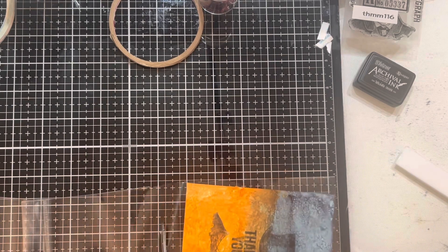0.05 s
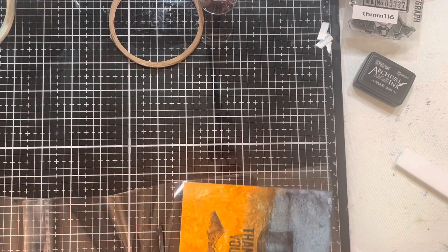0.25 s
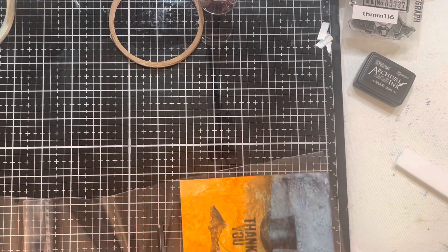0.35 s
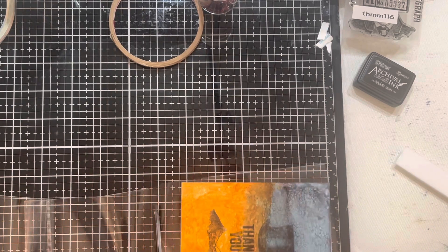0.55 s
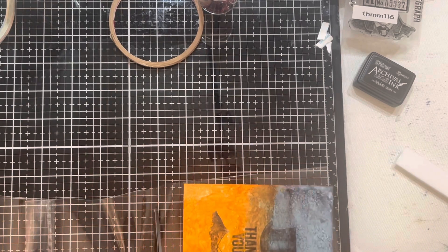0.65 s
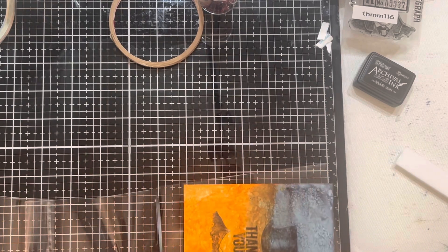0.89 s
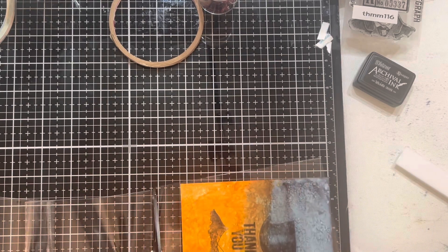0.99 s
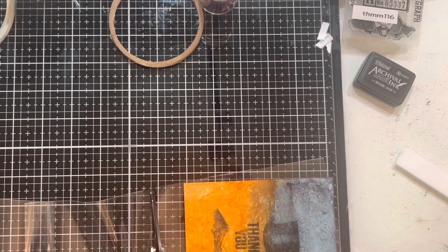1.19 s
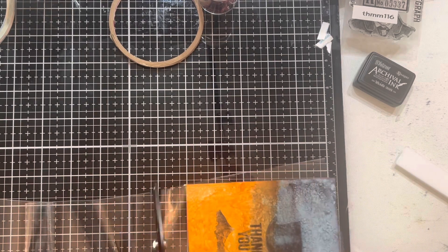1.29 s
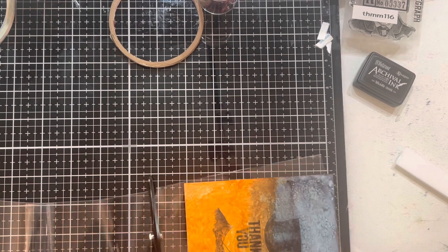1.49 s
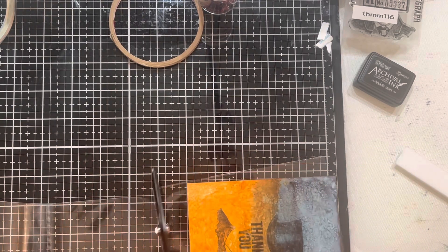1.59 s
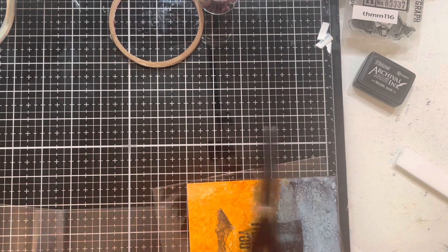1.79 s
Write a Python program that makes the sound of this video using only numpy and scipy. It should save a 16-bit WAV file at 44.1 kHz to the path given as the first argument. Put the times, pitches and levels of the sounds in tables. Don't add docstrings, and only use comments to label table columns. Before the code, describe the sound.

Scissors snip four times through thin crinkly plastic film, close up on a craft table

```python
import sys
import numpy as np
from scipy import signal
from scipy.fft import rfft, irfft
from scipy.io import wavfile
from scipy.ndimage import uniform_filter1d

SR = 44100
rng = np.random.default_rng(int(sys.argv[2]) if len(sys.argv) > 2 else 0)


def transcribe(u):
    v = np.clip(np.atleast_2d(u).T, -1, 1)
    q = np.round(v * 32767).astype(np.int16)
    wavfile.write(sys.argv[1], SR, q)


def linear_from_db(decibels):
    return 10 ** (np.asarray(decibels, float) / 20)


N = 81585


def noise():
    return rng.standard_normal(N)


def unit(x):
    return x / np.sqrt(np.mean(x ** 2) + 1e-18)


def colour(x, points):
    hz, db = np.array(points).T
    gain_db = np.interp(np.log(np.arange(1025) * SR / 2048 + 1), np.log(hz), db)
    cepstrum = irfft(gain_db * np.log(10) / 20)
    cepstrum[1:1024] *= 2
    taps = irfft(np.exp(rfft(cepstrum[:1024], 2048)))[:1024]
    return signal.fftconvolve(x, taps / np.linalg.norm(taps))[:N]


def band(x, hz, width_hz):
    return signal.lfilter(*signal.iirpeak(hz, hz / width_hz, SR), x)


def ticks(times_s, db):
    out = np.zeros(N)
    index = np.minimum((np.asarray(times_s) * SR).astype(int), N - 1)
    np.add.at(out, index, linear_from_db(np.asarray(db)))
    return out


def fade(x, peak_s):
    t = np.arange(int(12 * peak_s * SR)) / SR / peak_s
    return signal.fftconvolve(x, np.e * t * np.exp(-t))[:N]


def tilt(x, db):
    high = signal.butter(2, 5000, "high", fs=SR, output="sos")
    return x + (linear_from_db(db) - 1) * signal.sosfiltfilt(high, x)


# t/s, level/dB, slip rate/Hz, treble tilt/dB (bite moving along the blades)
STROKE_1 = [(.19, -38, 274, 2.5), (0.201, -29.5, 330, 1), (0.21, -21, 400, 4.5), (0.226, -29, 416, 3.5),
            (0.235, -22.5, 450, -1), (0.263, -24.5, 430, -3.5), (0.278, -33, 300, 4.5)]
STROKE_2 = [(.611, -32, 305.7, 0), (.621, -18.5, 328, 1), (.625, -20.5, 401.3, 0.5), (0.639, -25, 410.7, 4),
            (.66, -26, 433.2, 2), (0.674, -23.5, 394.5, 1.5), (0.687, -26, 254, 2)]
STROKE_3 = [(1.066, -59, 396.3, 1), (1.072, -27, 404.2, 1), (1.074, -21.5, 398.3, 1.5),
            (1.094, -23, 380.3, 3), (1.103, -27, 320.5, 5), (1.133, -23, 316, 3.5), (1.149, -29, 200, -2)]
STROKE_4 = [(1.482, -43, 450, 5), (1.489, -31.5, 451.8, 1.5), (1.498, -18.5, 788.7, 2.5),
            (1.51, -27, 800, 1.5), (1.519, -26.5, 780, 4), (1.53, -31, 441, 1.5), (1.542, -56, 400, -9),
            (1.56, -76, 386, -7)]
# f/Hz, level/dB
STROKE_COLOUR_1 = [(150, -37.5), (439, -6), (560, -11), (1600, -12.5), (2650, -7), (3770, -12.5),
                   (11300, -13.5), (16000, -24)]
STROKE_COLOUR_2 = [(150, -34), (414, -3.5), (534, -9), (821, -5.5), (1040, -12.5), (3100, -6.5),
                   (4500, -11.5), (5500, -9), (11500, -15.5), (16000, -18)]
STROKE_COLOUR_3 = [(150, -12.5), (980, 2.5), (1250, -4.5), (3300, -2), (7000, -7), (9300, -4),
                   (11500, -0.5), (13700, -3.5), (16000, -7.5)]
STROKE_COLOUR_4 = [(150, -50.5), (280, -13), (640, -12), (770, 1.5), (930, -9), (3000, -9.5), (8900, -7),
                   (12200, -4), (16000, -26.5)]
# t/s, peak/dB
LONE_SLIPS = [(0.1865, -28.5), (.194, -32), (0.1982, -32), (0.2057, -34), (.2098, -17), (0.2141, -26),
              (0.2158, -13.5), (0.2653, -14), (0.2666, -9.5), (0.271, -13), (.2732, -16), (.277, -12),
              (.2811, -15), (.287, -11), (.297, -11), (0.3051, -12), (0.6043, -20), (0.6074, -20.5),
              (0.6138, -14.5), (0.6177, -21), (0.6234, -12), (0.6243, -10), (0.6274, -11), (.6322, -16),
              (0.6346, -16), (0.6445, -14.5), (0.682, -17), (0.6857, -19), (0.6905, -10), (0.6952, -9.5),
              (0.7016, -11.5), (0.7166, -13), (0.723, -27), (1.0694, -24), (1.073, -12.5), (1.0785, -24),
              (1.0804, -9), (1.096, -14), (1.0983, -8.5), (1.1004, -8.5), (1.1045, -18), (1.1071, -7.5),
              (1.1094, -13.5), (1.1338, -22), (1.1383, -19.5), (1.1417, -16), (1.1464, -20),
              (1.1546, -14.5), (1.4847, -23), (1.4876, -30), (1.493, -16.5), (1.4981, -16.5),
              (1.5027, -9.5), (1.5137, -16.5), (1.5201, -9.5)]


def cuts():
    slip_s, slip_jitter, slip_scatter_db = .00025, .08, 1.5
    echo_s, echo_db = .00065, -11.5
    low_rub_db, rub_db = 7, -9
    t, out = np.arange(N) / SR, 0
    hiss, rub, lone = np.sign(noise()), noise(), np.array(LONE_SLIPS)
    rub = rub + linear_from_db(low_rub_db) * band(rub, 1200, 2500)
    strokes = (STROKE_1, STROKE_2, STROKE_3, STROKE_4)
    colours = (STROKE_COLOUR_1, STROKE_COLOUR_2, STROKE_COLOUR_3, STROKE_COLOUR_4)
    for stroke, tone in zip(strokes, colours):
        s, db, rate_hz, bright_db = np.array(stroke).T
        chance = rng.standard_normal((80, 2))
        phase = np.cumsum(np.interp(t, s, rate_hz, 0, 0)) / SR
        turns = np.arange(80) + slip_jitter * chance[:, 0] + .3
        when = np.interp(turns, phase, t)[turns < phase[-1]]
        when = when[abs(when[:, None] - lone[:, 0]).min(1) > .002]
        slip_db = np.interp(when, s, db) + slip_scatter_db * chance[:len(when), 1] + 2.5
        mine = lone[abs(lone[:, 0] - s.mean()) < .15]
        slips = ticks(when, slip_db + 2.2) + ticks(mine[:, 0], mine[:, 1] - 4)
        echo = linear_from_db(echo_db) * np.roll(slips, int(echo_s * SR))
        burst = .25 * fade(slips, slip_s) * hiss + 3.94 * (slips + echo)
        rubbing = linear_from_db(np.interp(t, s, db, -99, -99) + rub_db) * rub
        x = blade_ring(colour(spread(burst) + rubbing, tone))
        out = out + bite(x, np.interp(t, s, bright_db))
    return out


def spread(x):
    for hz, width_hz in ((10500, 2500), (8000, 3000), (5000, 2500)):
        x = x - 2 * band(x, hz, width_hz)
    return x


# f/Hz, width/Hz, level/dB
BLADE_MODES = [(281, 28.5, 4), (416.3, 19, -0.5), (780, 108, -3.5), (1775, 105, -5), (2580, 120, -29),
               (2650, 990, -5), (5480, 160, -1), (7320, 200, -2), (9950, 1960, 7), (10600, 2400, -17)]


def blade_ring(x):
    return 0.57 * x + sum(linear_from_db(db) * band(x, hz, width_hz) for hz, width_hz, db in BLADE_MODES)


def bite(x, db):
    edge = (linear_from_db(2 * db) - 1) * band(x, 5100, 1500)
    body = (linear_from_db(-2 * db) - 1) * band(x, 2650, 600)
    return tilt(x, db / 4) + edge + body


# f/Hz, level/dB
FILM_COLOUR = [(120, -57), (200, -6), (278, -11), (500, -15), (1120, -7), (2650, -7.5), (9060, -15.5),
               (11500, -9), (16000, -19)]
# t/s, level/dB, treble tilt/dB, sheet ring/dB
FILM_RUSTLE = [(0, -50, 6.5, 7.5), (0.083, -57.5, 6.5, 4.5), (.15, -72, -19, -2), (.34, -56, 8, 3),
               (0.501, -51.5, 5.5, 8), (.59, -62, 6, -10), (.75, -56.5, 11, -6), (0.868, -52, 5.5, 5),
               (0.948, -78, 13.5, 8.5), (1.001, -66, 10.5, 11.5), (1.05, -78, 0, -4), (1.314, -56, 17, -3),
               (1.36, -54.5, -7.5, -12), (1.46, -78, -15.5, -1), (1.56, -48, 15, 0),
               (1.645, -50.5, 14.5, 5), (1.674, -72.5, 18, 0), (1.85, -53.5, -4, -18)]


def rustle():
    creases_per_s, crease_s, patch_db = 2500, 0.00019, 3.2
    s, db, bright_db, sheet_db = np.array(FILM_RUSTLE).T
    t = np.arange(N) / SR
    k = int(SR / 60)
    patch = uniform_filter1d(np.repeat(rng.standard_normal(N // k + 1), k)[:N], k)
    struck = rng.random(N) < creases_per_s / SR
    creases = struck * linear_from_db(1.4 * np.minimum(rng.exponential(size=N), 3.5))
    grain = unit(fade(creases, crease_s) * noise()) + 0.3 * noise()
    out = tilt(unit(colour(grain, FILM_COLOUR)), np.interp(t, s, bright_db))
    out = out * linear_from_db(np.interp(t, s, db) + patch_db * patch)
    out = out + (linear_from_db(np.interp(t, s, sheet_db)) - 1) * band(out, 2900, 900)
    return signal.sosfilt(signal.cheby2(6, 22, 12300, fs=SR, output="sos"), out)


# t/s, peak/dB, f/Hz, ring/dB
FILM_CRACKS = [(0.0678, -30.5, 2870, 8.5), (0.4328, -30, 9900, 15), (0.509, -35, 2980, 5),
               (0.553, -17, 4640, 1), (0.5539, -20, 1310, 0.5), (0.564, -40, 1400, 10),
               (0.414, -45, 1770, 12), (0.8176, -37, 1720, 15), (0.821, -35, 1306, 13),
               (1.625, -37, 4500, 5), (1.635, -45, 5100, 2), (1.2386, -31.5, 3470, 10),
               (1.246, -35, 3940, 11), (1.27, -28, 2900, 9.5), (1.288, -46, 5000, 2),
               (1.313, -34, 9300, 15.5), (1.3706, -34.5, 2380, 8.5), (1.389, -28, 4830, -7),
               (1.543, -30.5, 2220, 16), (1.584, -23, 1700, 5), (1.654, -38.5, 936, 5),
               (1.716, -44, 1430, 14.5), (1.788, -41.5, 1400, 14), (1.805, -22, 2260, -1.5),
               (1.835, -25, 6840, 3.5), (1.838, -22, 1450, 4.5), (1.843, -24.5, 2460, 11)]


def cracks():
    crack_s, tail_s = .0004, .002
    out, hiss = 0, np.sign(noise())
    for at_s, db, hz, ring_db in FILM_CRACKS:
        snap = ticks([at_s], [db - 9.5])
        x = fade(snap, crack_s) * hiss + 3.0 * snap
        x = x + .1 * fade(snap, tail_s) * hiss[::-1]
        ring = band(x + snap * SR / hz / 2, hz, hz / 3)
        out = out + 0.77 * colour(x, FILM_COLOUR) + linear_from_db(ring_db) * ring
    return out


# f/Hz, level/dB, t60/s
TABLE_MODES = [(74.9, -15, 0.57), (114.7, -5, 0.18), (149.2, -4, 0.25), (267.5, 11.5, 0.083),
               (419, 1.5, 0.077)]
# t/s, peak/dB, low-mode depth/dB
HANDLE_KNOCKS = [
    (0.102, -42.5, 3.5),
    (0.191, -39, -26),
    (0.419, -29.5, -1),
    (0.616, -39, -8),
    (.82, -29.5, 3.5),
    (1.067, -48, -6),
    (1.239, -38.5, -14),
    (1.301, -46, 0.5),
    (1.493, -47.5, 4.5),
]


def knocks():
    t = np.arange(N) / SR
    rings = []
    for hz, db, t60_s in TABLE_MODES:
        onset = 1 - np.exp(-(t * hz / 0.48) ** 2)
        rings.append(linear_from_db(db) * np.sin(2 * np.pi * hz * t) * onset * 1000. ** (-t / t60_s))
    rings = np.array(rings)
    s, db, depth_db = np.array(HANDLE_KNOCKS).T
    shake = noise()

    def push(level_db):
        strike = fade(ticks(s, level_db - 40), 0.00031)
        return strike + 0.24 * fade(ticks(s + 0.0065, level_db - 36.0), 0.013) * shake

    low = signal.fftconvolve(push(db + depth_db), rings[:3].sum(0))[:N]
    return low + signal.fftconvolve(push(db), rings[3:].sum(0))[:N]


def hump(at_s, length_s):
    t = np.arange(N) / SR
    return np.sin(np.pi * np.clip((t - at_s) / length_s, 0, 1)) ** 2


# t/s, length/s, level/dB, f/Hz
PIVOT_CREAKS = [
    (0.372, 0.029, -42.5, 617),
    (0.4, 0.028, -48, 630),
    (0.776, 0.042, -41.5, 575),
    (1.228, 0.061, -45.5, 430),
]


def creaks():
    out, rough = 0, noise()
    for at_s, length_s, db, hz in PIVOT_CREAKS:
        voice = unit(band(rough, hz, hz / 3))
        voice = voice + 0.43 * unit(band(band(rough, 1680, 180), 1660, 300))
        voice = voice + 0.26 * unit(band(rough, 267, 67))
        out = out + linear_from_db(db) * np.sqrt(hump(at_s, length_s)) * voice
    return out


# t/s, level/dB, length/s
HAND_BUMPS = [
    (0.286, -49, 0.085),
    (0.516, -57, 0.037),
    (0.918, -72, 0.034),
    (1.573, -65, 0.054),
]


def bumps():
    low = unit(band(noise(), 86, 55))
    return sum(linear_from_db(db) * hump(at_s, length_s) * low for at_s, db, length_s in HAND_BUMPS)


def room(near):
    t60_s, room_db, side_db, bass_left_db = 0.18, -9.5, -10, -9
    t = np.arange(SR // 3) / SR
    tails = rng.standard_normal((2, len(t))) * 1000. ** (-t / t60_s) * (t > .004)
    mid, side = (signal.fftconvolve(near, h / np.linalg.norm(h))[:N] for h in tails)
    side = linear_from_db(side_db) * (band(side, 710, 720) + 0.098 * side)
    side = side + linear_from_db(bass_left_db) * band(near, 313, 150)
    return linear_from_db(room_db) * mid + side * np.array([[1], [-1]])


# f/Hz, level/dB
AIR_COLOUR = [(30, -9.5), (70, -6.5), (300, -13), (1500, -23.5), (5000, -32.5), (11000, -31), (12500, -59)]


def air():
    return linear_from_db(-70) * unit(colour(noise(), AIR_COLOUR))


def scene():
    near = cuts() + rustle() + cracks() + knocks() + creaks() + bumps()
    return near + room(near) + air()


# t/s, length/s, lowest f/Hz, level/dB
TOP_OPENINGS = [(.184, .007, 13200, -20), (0.433, .009, 12800, -13), (.44, .05, 15300, -6),
                (0.545, .009, 13300, -14), (.602, .04, 12800, -16), (.665, .07, 14700, -4),
                (.7, .035, 13200, -6), (.74, .04, 15000, -12), (1.067, .01, 13200, -15),
                (1.092, 0.088, 15000, -9), (1.14, 0.046, 13200, -26), (1.487, .01, 14400, -7),
                (1.578, .042, 14800, 1)]


def top_band(both):
    t, top = np.arange(N) / SR, 0
    for at_s, length_s, hz, db in TOP_OPENINGS:
        is_open = 1. * (abs(t - at_s - length_s / 2) < length_s / 2)
        gate = uniform_filter1d(is_open, size=150)
        sos = signal.ellip(4, 1, 50, [hz, 15900], "band", fs=SR, output="sos")
        top = top + linear_from_db(db) * gate * signal.sosfilt(sos, both)
    return top


def top_cut(x):
    return signal.sosfilt(signal.butter(12, 16990, fs=SR, output="sos"), x)


def record(dry):
    port_hz, port_width_hz, left_db, top_hz = 10215, 1710, 0.35, 13150
    left = dry[0] - 2 * band(dry[0], port_hz, port_width_hz)
    low_cut = signal.butter(3, 45, "high", fs=SR, output="sos")
    both = signal.sosfilt(low_cut, [linear_from_db(left_db) * left, dry[1]])
    roll_off = signal.cheby2(10, 70, top_hz + 900, fs=SR, output="sos")
    mix = signal.sosfilt(roll_off, both) + top_band(both)
    return top_cut(mix)


dry = scene()
out = record(dry)
transcribe(out)
```